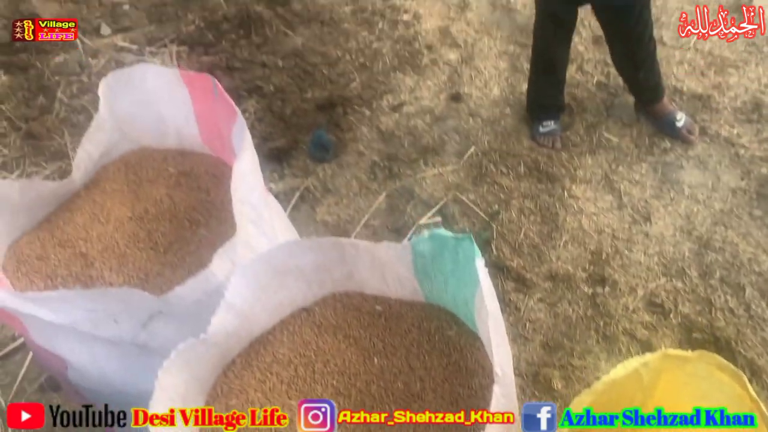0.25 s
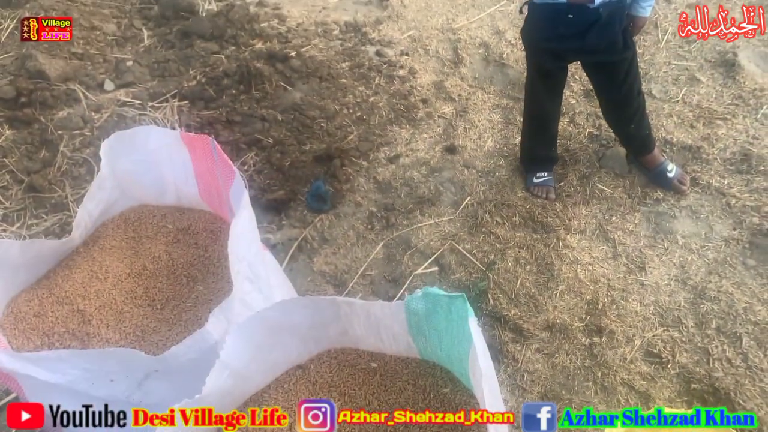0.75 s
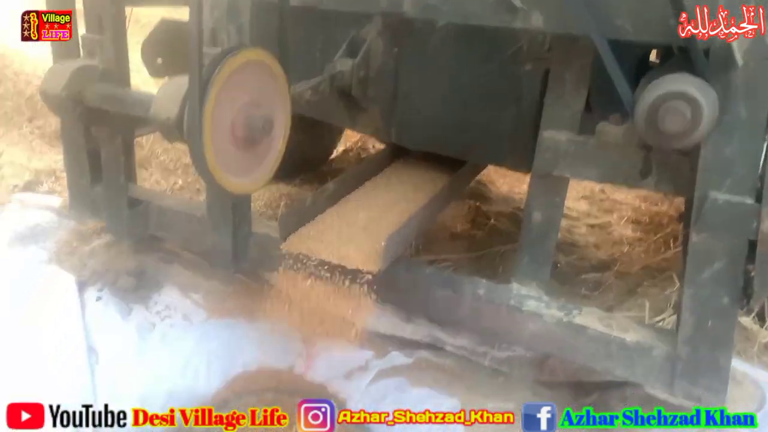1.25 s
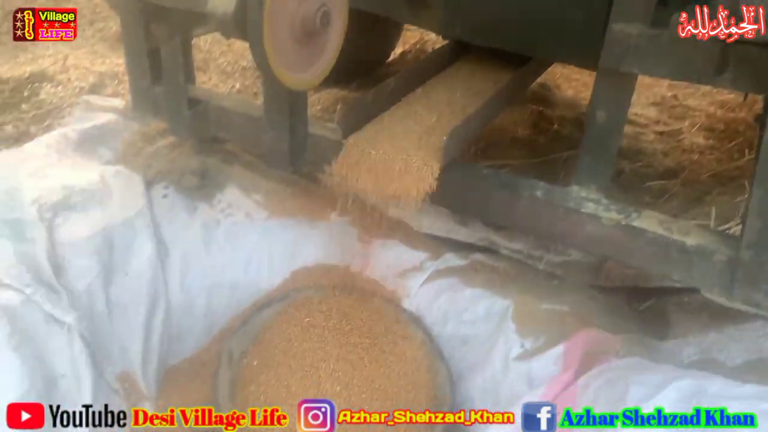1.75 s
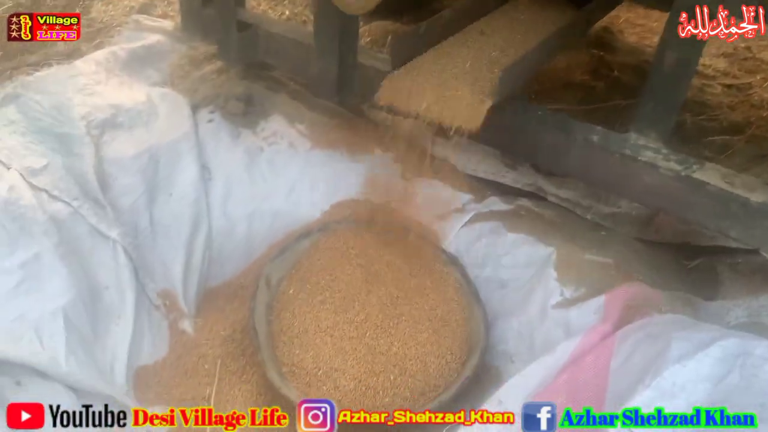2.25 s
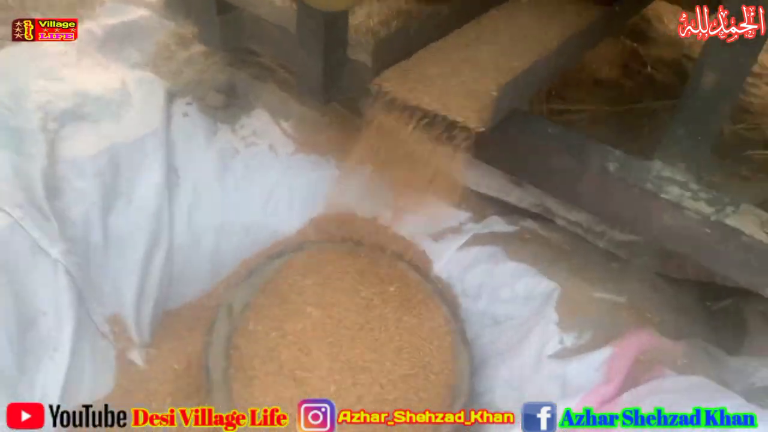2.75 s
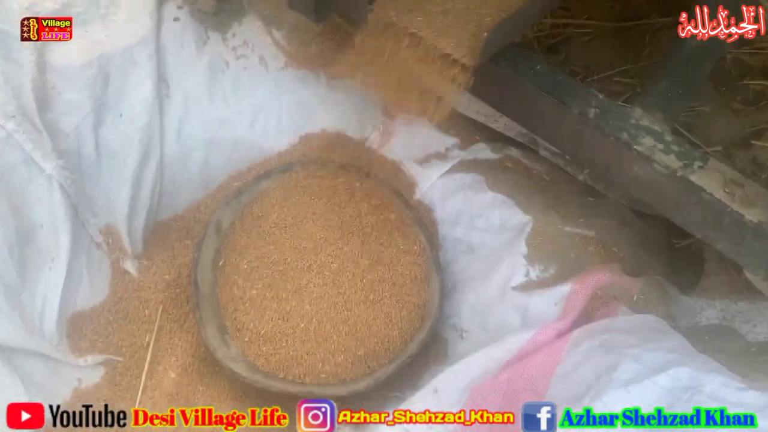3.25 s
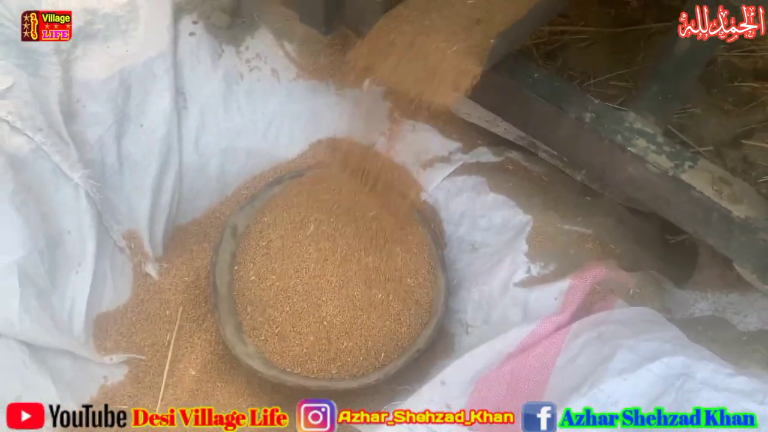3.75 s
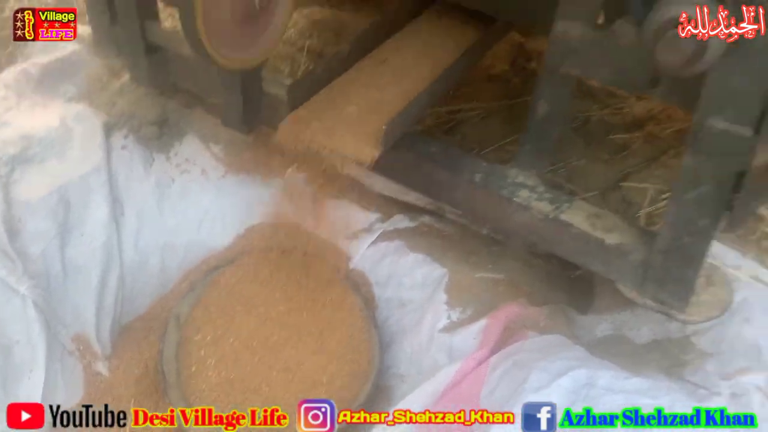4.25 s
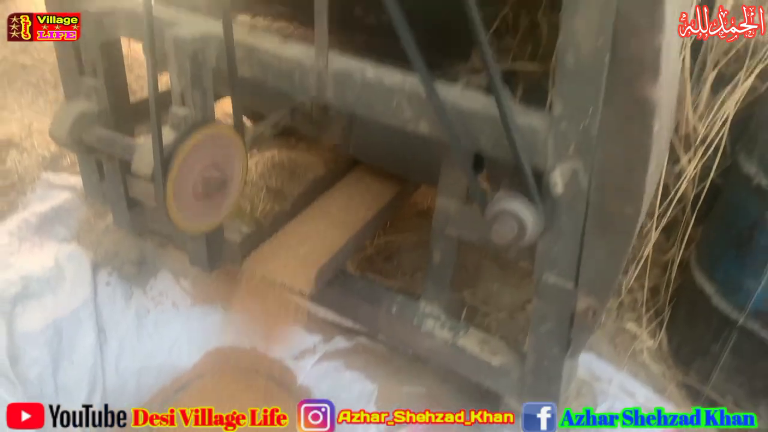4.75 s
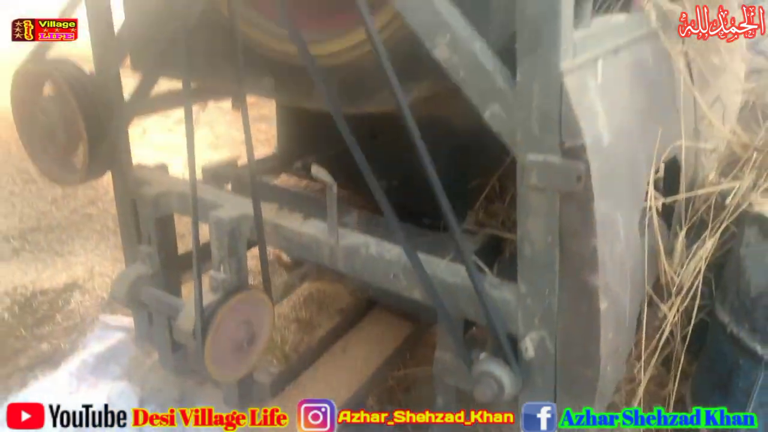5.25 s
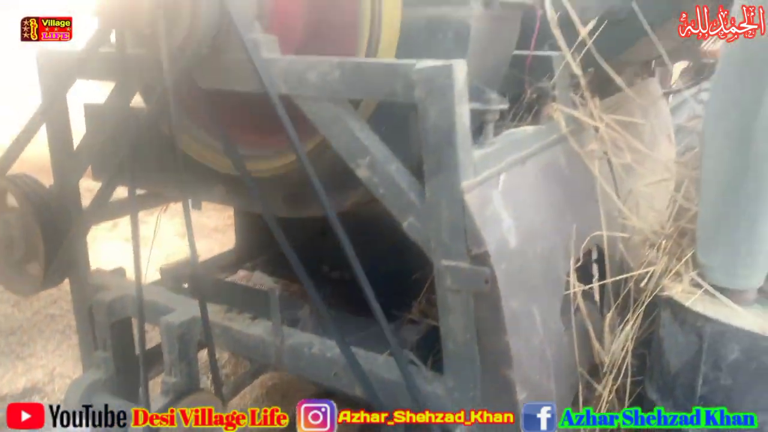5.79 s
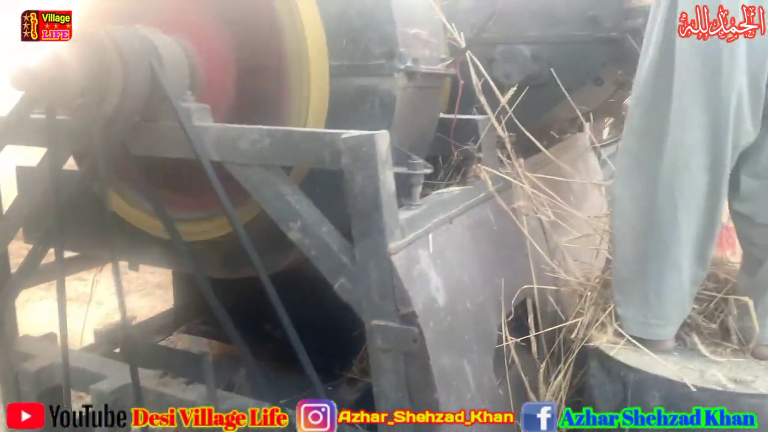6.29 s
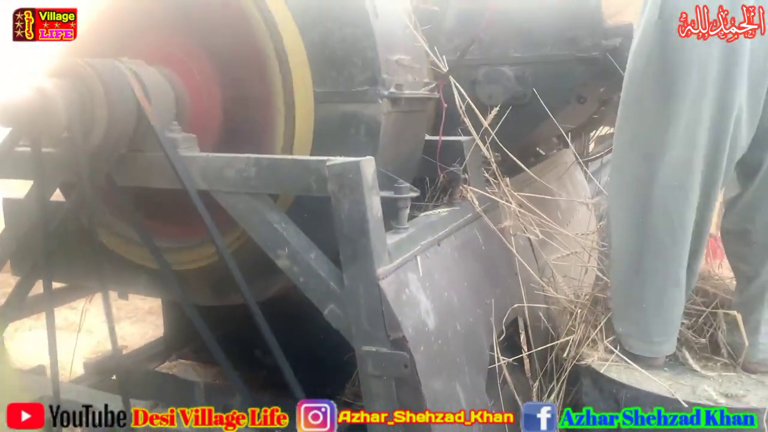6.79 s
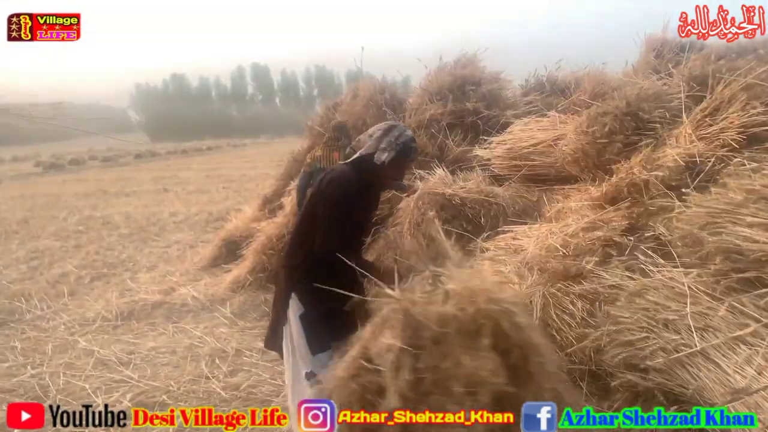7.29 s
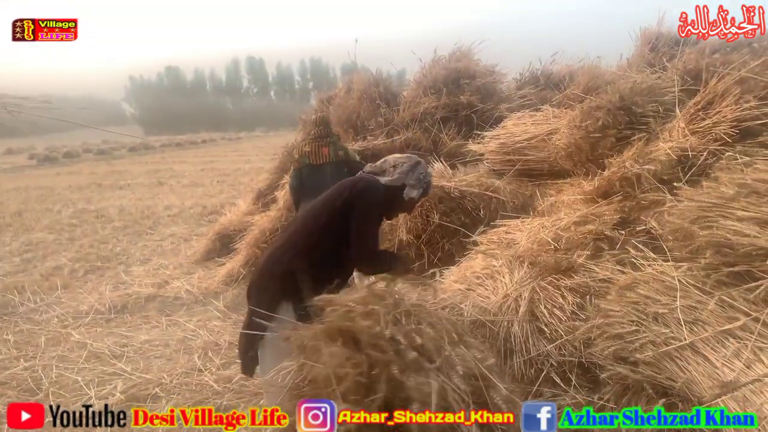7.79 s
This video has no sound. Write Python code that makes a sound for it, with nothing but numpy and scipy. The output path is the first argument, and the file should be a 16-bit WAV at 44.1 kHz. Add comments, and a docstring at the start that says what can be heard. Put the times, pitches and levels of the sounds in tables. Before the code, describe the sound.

From 0 to 1 second, near the grain sacks, a tractor engine drones low and steady under a thick midrange threshing roar, with soft grain hiss and a few faint metallic slaps. At about 1.04 a hard cut with a tiny dip jumps to the chute: the engine is slightly higher, the hiss brighter and closer, and sheet metal chatters. Clear tinny slaps run from 1.6 to 2.4, then around 2.9 to 4.0. The stereo handheld microphone turns past the belts near 4.8, with hard slaps until 5.5, reaching the drum, whose casing rings hollowly and waveringly around 800 hertz as the engine sags slightly. More slaps come from 6.3 to 6.9. At 7.1 another cut moves to the straw stack: duller continuous roar, reduced hiss, faint rattles, continuing to the end at 8.

```python
"""A tractor engine drones under the dull roar of a wheat thresher, heard close by from behind the grain sacks.
The engine is a stack of tones tied to its firing; roar and hiss are shaped noise, the hiss from grain strikes.
The drum casing rings in wavering bands of noise, and a sheet-metal sieve chatters and slaps in runs.
The sound cuts to the grain chute, turns past the belts to the drum, then cuts to the straw stack."""
import sys
import numpy as np
from scipy import signal
from scipy.fft import rfft, irfft, next_fast_len
from scipy.io import wavfile

SR = 44100
rng = np.random.default_rng(int(sys.argv[2]) if len(sys.argv) > 2 else 0)


def waveform_to_disk(signal):
    """Save audio, clipped to [-1, 1], as 16-bit WAV at the path in sys.argv[1]."""
    frames = np.transpose(np.atleast_2d(signal))
    scaled = np.clip(frames, -1, 1) * 32767
    samples = np.round(scaled).astype(np.int16)
    wavfile.write(sys.argv[1], SR, samples)


N = 354123

# moments when the listening place jumps and the sound briefly almost drops out: cut_s
CUTS_S = [1.043, 7.104]
FADE_OUT_S, FADE_IN_S = .004, .016
# the slow turn leaves the chute, passes the belts, reaches the drum: time_s
TURN_S = [3.3, 4.79, 5.53]
# how the two ears differ at the sacks, chute, belts, drum and stack:
# left_lag_ms, left_lag_rad, channels_alike_up_to_hz, likeness_above_0_to_1
STANDPOINTS = [(0.337, 0.45, 1450, 0.4), (0.209, 0.016, 650, 0.2), (0.138, .02, 600, 0.22),
               (0.015, .02, 900, .15), (-0.485, 0.041, 2200, 0.5)]
# overall levels at the sacks, chute, belts, drum and stack: roar_db, grain_hiss_db
LEVELS = [(-15, -30), (-14.5, -23), (-17, -24.5), (-15, -25), (-15.5, -27.5)]

# engine speed, one list a shot: time_s, firings_per_s
SPEED = [
    [(0, 43.7), (1.04, 43.2)],
    [(1.05, 45.7), (2.2, 46.3), (3.8, 46.7), (5.0, 45.1), (6.0, 43.6), (7.1, 43.3)],
    [(7.11, 43.2), (8.03, 43.7)],
]
# engine tones at each standpoint: order_per_cycle (three firings a cycle), level_db (before chance)
ORDERS_SACKS = [(3, -18), (4, -22), (5, -20.5), (6, -13.5), (7, -30), (9, -24), (12, -35), (15, -43),
                (18, -25), (21, -30), (24, -27), (27, -26.5)]
ORDERS_CHUTE = [(3, -15), (4, -31), (5, -27), (6, -13.5), (7, -33), (9, -22), (12, -25), (15, -29),
                (18, -40), (21, -30), (24, -27.5), (27, -27)]
ORDERS_BELTS = [(3, -17), (4, -31), (5, -22), (6, -15.5), (7, -33), (9, -22), (12, -36), (15, -22),
                (18, -23.5), (21, -21), (24, -31), (27, -27.5)]
ORDERS_DRUM = [(3, -21.5), (4, -28), (5, -31), (6, -17.5), (7, -37), (9, -24.5), (12, -44), (15, -24),
               (18, -19), (21, -26.5), (24, -33.5), (27, -32)]
ORDERS_STACK = [(3, -23), (4, -27), (5, -39), (6, -21), (7, -28), (9, -26), (12, -36), (15, -44), (18, -25),
                (21, -50), (24, -33), (27, -39)]

# tone colour of drum, fan and exhaust roar at each standpoint: pitch_hz, relative_level_db
ROAR_SACKS = [(36, -22), (60, -18), (75, -19), (110, -10), (160, 3), (200, -6.5), (290, 0), (400, -0.5),
              (520, -3), (650, -2), (850, 0), (1050, -10.5), (1400, -14), (2000, -58)]
ROAR_CHUTE = [(36, -22), (60, 4.5), (75, -2), (110, -1.5), (160, -3), (200, -5.5), (270, -7), (330, -5.5),
              (400, -5.5), (520, -7), (650, -8), (850, -10.5), (1050, -13), (1400, -16), (2000, -26.5)]
ROAR_BELTS = [(36, -15), (60, -8), (75, 2), (110, -10.5), (160, -8), (200, -8.5), (290, -6), (400, -10.5),
              (520, -9.5), (650, -16), (850, -13.5), (1050, -17), (1400, -23.5), (2000, -44)]
ROAR_DRUM = [(36, -28), (60, 3), (75, -3), (110, -3), (160, -3), (200, -6.5), (290, -3.5), (400, -11),
             (520, -12), (650, -9), (850, -10.5), (1050, -17), (1400, -22.5), (2000, -32)]
ROAR_STACK = [(36, -19), (60, -15), (75, 3), (110, -8), (160, -2), (200, -0.5), (290, 1.5), (400, 1),
              (520, -1), (650, -6), (850, -1.5), (1050, -5.5), (1400, -17), (2000, -34)]

# tone colour of grain and chaff hiss at each standpoint: pitch_hz, relative_level_db
GRAIN_SACKS = [(1100, -8), (1600, -4), (2200, -6), (3000, -9), (4000, -11), (5200, -12), (6500, -14),
               (7800, -16), (8100, -15), (8800, -19), (10500, -21), (13000, -23), (14300, -26),
               (14900, -36)]
GRAIN_CHUTE = [(1100, -4), (1600, -3), (2200, -6), (3000, -10.5), (4000, -12), (5200, -15.5), (6500, -14),
               (7800, -15), (8150, -8.5), (8700, -13), (10500, -16), (13000, -19), (14300, -22),
               (14900, -32)]
GRAIN_BELTS = [(1100, -4), (1600, -3), (2200, -6), (3000, -9.5), (4000, -10), (5200, -14.5), (6500, -13),
               (7800, -14), (8150, -8.5), (8700, -13), (10500, -15), (13000, -18.5), (14300, -21.5),
               (14900, -32)]
GRAIN_DRUM = [(1100, -4), (1600, -2), (2200, -5), (3000, -7), (4000, -7), (5200, -11), (6500, -12),
              (7800, -12), (8150, -8.5), (8700, -11), (10500, -13.5), (13000, -16), (14300, -19),
              (14900, -29)]
GRAIN_STACK = [(1100, -6), (1600, -6), (2200, -5), (2900, -6), (3300, -12), (5200, -17), (6500, -18),
               (7800, -19), (8100, -16), (8800, -18), (10500, -19), (13000, -22), (14300, -24),
               (14900, -34)]

# two casing rings and a broad swell in the roar, one list a shot:
# time_s, upper_ring_hz, upper_level_db, lower_ring_hz, lower_level_db, swell_hz, swell_level_db
RINGS = [
    [(0, 850, -31, 620, -27.5, 995, -50), (1.04, 855, -29.5, 620, -26, 996, -48)],
    [(1.05, 830, -32, 640, -26, 1130, -30), (1.6, 802, -44, 660, -33, 1200, -34),
     (2.0, 797, -26.5, 660, -27, 1270, -28), (2.3, 812, -41, 620, -41, 1289, -31.5),
     (2.6, 818, -26, 580, -31, 1330, -29.5), (3.1, 815, -28, 580, -29, 1481, -27.5),
     (3.7, 810, -37, 590, -37, 1397, -36), (4.0, 815, -30, 600, -44, 1356, -35),
     (4.6, 822, -26, 620, -33, 1030, -30), (5.0, 800, -41, 620, -25.5, 995, -35),
     (5.5, 798, -27, 630, -26, 926, -40), (6.0, 799.6, -27, 660, -30, 926, -31),
     (6.5, 807, -23.5, 660, -45, 932, -30), (7.1, 815, -24.5, 660, -38, 930, -35)],
    [(7.11, 998, -40, 870, -38, 996, -48), (8.03, 988, -41, 870, -38, 1000, -50)],
]
CASING_WIDTH_HZ, SWELL_WIDTH_HZ = 36, 130

# natural rings of the sieve's sheet metal: ring_hz, width_hz, relative_level_db
SIEVE = [(1040, 60, 0), (1280, 70, 1), (1500, 70, 0), (1720, 80, -1), (2370, 70, -1), (2650, 80, -3),
         (2900, 90, -1), (3150, 80, -1), (3380, 80, 0), (3680, 70, 1), (4150, 100, -3), (4700, 140, -7),
         (5150, 120, -6), (5650, 130, -8)]
# clear slaps at the ends of sieve strokes, in runs:
# start_s, strength_db, strongest_ring_hz, lower_ring_hz, lower_boost_db, treble_relative_to_slap_db
SLAPS = [(0.129, -24, 2700, 2370, 0, -12), (0.319, -24, 2450, 2370, 0, -13),
         (0.771, -27, 2660, 2370, 0, -11), (0.899, -27, 2780, 2370, 0, -13), (1.289, -27, 4600, 2370, 0, 3),
         (1.629, -17.5, 3686, 2370, 7, -6), (1.814, -18, 3670, 2370, 4, -4),
         (1.992, -19.5, 3220, 2370, 3, 1), (2.174, -16.5, 3397, 1720, 12, -1.5),
         (2.362, -21.5, 3700, 2370, 12, -1), (2.598, -25, 2900, 1720, 2, -2),
         (2.928, -24, 3540, 2370, 0, -2), (3.098, -22, 2930, 2370, 2, -4), (3.280, -17.5, 3450, 2340, 3, 0),
         (3.378, -30, 2890, 1720, 3, -6), (3.462, -17, 3190, 2370, 6, -2), (3.634, -20, 4150, 2400, 5, -1),
         (3.823, -19.5, 2920, 2370, 6, -4), (4.006, -19, 4120, 1720, 5, -3),
         (4.747, -19, 3000, 2370, 3, -4), (4.934, -16, 3660, 2640, 7, -1), (5.118, -17, 3670, 2354, 7, -6),
         (5.307, -15, 3670, 3150, 4, -5.5), (5.508, -23, 2896, 2364, 3, -10),
         (6.279, -21, 3147, 2370, 4, -13), (6.472, -17.5, 3150, 2650, 6, -9),
         (6.663, -20, 2900, 2370, 3, -7), (6.756, -25, 2910, 1717, 3, -14), (6.859, -15, 3160, 2370, 4, -6),
         (7.196, -24, 4150, 2370, 5, -10), (7.396, -25, 2630, 1720, 3, -9), (7.49, -28, 2630, 2374, 0, -10),
         (7.747, -30, 2650, 1730, 3, -14)]
# a slap is a quick run of touches: delay_s, relative_level_db
TOUCHES = [(0, -3), (.0045, 0), (.008, 0), (.013, -3)]
# T60 is the time to die away by 60 dB; the tail's level is relative to the slap
SLAP_RISE_S, SLAP_TOUCH_T60_S, SLAP_T60_S, SLAP_TAIL_DB = .002, .035, .09, -4
KNOCK_DB, SLAP_RATTLE_DB, BROAD_DB = 21, -2, -8   # one click, ringing rattle, broad rattle
TICKS_PER_S, TICK_DB = 67, 6.5   # loose straw and stones tick each ring; least tick above the flow

# left-right balance of the two microphone ports: pitch_hz, left_minus_right_db
PORTS = [(40, -2.5), (200, -3.5), (500, -1), (1000, 1.3), (2200, 1), (4500, -1), (7700, -2), (8200, -7.5),
         (8900, -2.5), (10000, -.5), (14000, -.3)]
# treble that both ports share, late on the left: from_hz, full_hz, likeness_0_to_1, lag_ms, lead_rad
SHARED_TREBLE = (7000, 10000, .75, .305, .6)
CUTOFF_HZ = 14900


def from_db(db):
    """Turn a level in dB into a plain multiplier."""
    return np.exp(np.asarray(db) * (np.log(10) / 20))


def rms_one(x):
    """Scale a sound to an average strength (rms) of 1."""
    return x / np.sqrt(np.mean(x ** 2) + 1e-20)


def in_time(tables):
    """Join the shots' rows by straight lines and give each column as a curve over time."""
    s, *columns = np.transpose(np.concatenate(tables))
    t = np.arange(N) / SR
    return [np.interp(t, s, column) for column in columns]


def at_hz(points, hz):
    """Read a tone colour in dB between its points, with pitch spaced by ratio."""
    point_hz, point_db = np.array(points).T
    return np.interp(np.log(hz + 1), np.log(point_hz), point_db)


def drift(rate):
    """Wander slowly by chance with rms 1; a higher rate in Hz wanders faster."""
    step = 40   # samples between slow points
    r = np.exp(-2 * np.pi * rate * step / SR)
    chance = rng.standard_normal(N // step + 2002)
    slow = signal.lfilter([1], [1, -2 * r, r * r], chance)[2000:]
    return np.interp(np.arange(N) / step, np.arange(len(slow)), rms_one(slow))


def resonance(x, hz, width_hz):
    """Ring at one pitch like a struck sheet, with gain 1 at the peak; narrower rings last longer."""
    r = np.exp(-np.pi * width_hz / SR)
    feed = np.array([1, 0, -1]) * (1 - r * r) / 2
    return signal.lfilter(feed, [1, -2 * r * np.cos(2 * np.pi * hz / SR), r * r], x)


def standing():
    """Share of each standpoint over time: two hard cuts and one slow turn between them."""
    t = np.arange(N) / SR
    close = (t >= CUTS_S[0]) & (t < CUTS_S[1])
    turn = [close * np.interp(t, TURN_S, facing) for facing in np.eye(3)]
    return np.array([t < CUTS_S[0], *turn, t >= CUTS_S[1]])


def heard(pair, spectra, shares):
    """Colour two unrelated noises for each place, alike in the bass and with the left shifted in time."""
    size = next_fast_len(N)
    hz = np.fft.rfftfreq(size, 1 / SR)
    mid, side = rfft(pair, size)
    out = 0
    for spectrum, share, standpoint in zip(spectra, shares, STANDPOINTS):
        lag_ms, lag_rad, alike_hz, rest = standpoint
        alike = np.clip(rest + (1 - rest) / (1 + (hz / alike_hz) ** 2), 0, 1)
        colour = from_db(at_hz(spectrum, hz)) * (hz > 30)
        common = np.sqrt(1 + alike) * mid
        different = np.sqrt(1 - alike) * side
        delay = np.exp(-1j * (2 * np.pi * hz * lag_ms / 1000 + lag_rad))
        channels = np.array([(common + different) * delay, common - different])
        out = out + share * rms_one(irfft(colour * channels, size)[:, :N])
    # keep the strength steady while two places blend
    return out / np.sqrt(np.sum(shares ** 2, axis=0))


def engine(shares):
    """Even firing makes clean tones at every third order; uneven cylinders fill in unsteady ones between."""
    firings, = in_time(SPEED)
    cycle = 2 * np.pi * np.cumsum(firings) / SR / 3   # three firings make one cycle
    lag_ms, lag_rad = np.transpose(STANDPOINTS)[:2] @ shares
    out = np.zeros((2, N))
    for rows in zip(ORDERS_SACKS, ORDERS_CHUTE, ORDERS_BELTS, ORDERS_DRUM, ORDERS_STACK):
        order = round(rows[0][0])
        level_db = np.transpose(rows)[1] @ shares
        late = 2 * np.pi * order * firings / 3 * lag_ms / 1000 + lag_rad
        if order % 3:
            chance = .5 + .6 * (drift(3) + 1j * drift(3))
            size, turn = np.abs(chance), np.angle(chance)
        else:
            size = from_db((.3 + .012 * order) * drift(4))
            turn = rng.uniform(0, 2 * np.pi) + .003 * order * drift(3)
        phase = order * cycle + turn
        out += np.sqrt(2) * from_db(level_db) * size * np.cos([phase - late, phase])
    return out


def roar(level_db, shares):
    """Beaters tearing straw, fan and exhaust turbulence make dull noise that swells a little."""
    white = rng.standard_normal((2, N)) * from_db(0.37 * drift(4.4))
    dull = signal.sosfilt(signal.butter(4, 2200, fs=SR, output="sos"), white)
    spectra = [ROAR_SACKS, ROAR_CHUTE, ROAR_BELTS, ROAR_DRUM, ROAR_STACK]
    return from_db(level_db) * heard(dull, spectra, shares)


def grain(level_db, shares):
    """Thousands of kernels strike sheet metal and the heap; the flow comes in clumps."""
    strength = from_db(1.9 * np.minimum(rng.exponential(1, (2, N)), 5))
    sizes = strength * rng.choice([-1, 1], (2, N))
    hits = rng.random((2, N)) < 14000 / SR   # about 14000 strikes per second in each channel
    clumps = from_db(.5 * drift(3) + .5 * drift(12) + .3 * drift(40))
    strikes = sizes * hits * clumps
    thin = signal.sosfilt(signal.butter(4, 1000, "high", fs=SR, output="sos"), strikes)
    spectra = [GRAIN_SACKS, GRAIN_CHUTE, GRAIN_BELTS, GRAIN_DRUM, GRAIN_STACK]
    return from_db(level_db) * heard(thin, spectra, shares)


def casing():
    """The drum casing rings in two unsteady bands under the beaters, with a broader drifting swell."""
    out, columns = 0, in_time(RINGS)
    widths = [CASING_WIDTH_HZ, CASING_WIDTH_HZ, SWELL_WIDTH_HZ]
    for hz, level_db, width_hz in zip(columns[::2], columns[1::2], widths):
        shared = drift(width_hz / 2) + 1j * drift(width_hz / 2)
        own = drift(width_hz / 2) + 1j * drift(width_hz / 2)
        carrier = np.exp(2j * np.pi * np.cumsum(hz) / SR)
        channels = np.array([shared, shared + 0.56 * own]) * carrier
        out = out + from_db(level_db) * rms_one(channels.real)
    return out


def sieve_chatter(flow_db):
    """Grain flow shakes each ring of the sheet, the low ones most; loose straw and stones add ticks."""
    flares = np.array([from_db(flow_db + 5 + 4.5 * drift(11)) / (1 + (hz / 1900) ** 2.2)
                       for hz, _, _ in SIEVE])
    hits = rng.random(flares.shape) < TICKS_PER_S / SR
    ticks = hits * from_db(4.4 * np.minimum(rng.exponential(1, N), 3))
    return flares + ticks * from_db(flow_db + TICK_DB)


def sieve(flow_db):
    """The sheet chatters with the flow; the load slaps it in a few touches and the rattle dies away."""
    modes = sieve_chatter(flow_db)
    knocks = np.zeros(modes.shape)
    rattle, treble = np.zeros(N), np.zeros(N)
    mode_hz = np.array(SIEVE)[:, 0]
    t = np.arange(-.03 * SR, .15 * SR) / SR   # time around one slap
    tail = (t > 0) * from_db(SLAP_TAIL_DB - 60 * np.maximum(t, 0) / SLAP_T60_S)
    touch_s, touch_db = np.transpose(TOUCHES)[:, :, None]
    touches = rng.normal(0, 1, (len(SLAPS), 2, len(TOUCHES), 1))
    chance_db = rng.normal(0, 1.5, (len(SLAPS), len(SIEVE)))
    for slap, own_db, (late, hard) in zip(SLAPS, chance_db, touches):
        s, strength_db, ring_hz, lower_hz, lower_db, treble_db = slap
        since = t - touch_s - .001 * late   # each touch comes about 1 ms early or late
        rise = np.exp(np.minimum(since, 0) / SLAP_RISE_S)
        decay_db = -60 * np.maximum(since, 0) / SLAP_TOUCH_T60_S
        blow = rise * from_db(touch_db + 1.5 * hard + decay_db)
        shape = np.maximum(blow.max(axis=0), tail) * from_db(strength_db)
        at = round(s * SR) + np.arange(len(t)) - round(.03 * SR)
        # rings near the strongest pitch take most of a hard blow
        near_db = (4 + (strength_db + 24)) * np.exp(-(np.log(mode_hz / ring_hz) / .055) ** 2)
        near_db = near_db + lower_db * np.exp(-(np.log(mode_hz / lower_hz) / .07) ** 2)
        # one click goes in at the second touch's listed time
        knock_at = round((s + touch_s[1, 0]) * SR)
        knocks[:, knock_at] = from_db(own_db + near_db + strength_db + KNOCK_DB)
        modes[:, at] += from_db(own_db + near_db + SLAP_RATTLE_DB)[:, None] * shape
        rattle[at] += shape
        treble[at] += from_db(treble_db) * shape
    white = rng.standard_normal((3, 2, N))
    shaking = 0.72 * white[0] + 0.33 * white[0, 0]   # partly shared by both channels
    rings = 0
    for k, (hz, width_hz, db) in enumerate(SIEVE):
        push = shaking * modes[k] + (-1) ** k * knocks[k]
        rings = rings + from_db(db) * resonance(push, hz, width_hz) * np.sqrt(SR / width_hz)
    broad = signal.sosfilt(signal.butter(2, [1400, 4800], "band", fs=SR, output="sos"), white[1])
    bright = signal.sosfilt(signal.butter(2, [5500, 13000], "band", fs=SR, output="sos"), white[2])
    broad_rattle = from_db(BROAD_DB) * rattle * rms_one(broad)
    return from_db(-21.5) * rings + broad_rattle + treble * rms_one(bright)


def scene():
    """Add all sources as heard from the changing standpoint."""
    shares = standing()
    roar_db, grain_db = np.transpose(LEVELS) @ shares
    # the chatter is faint away from the machine, at the sacks and the stack
    chatter_db = grain_db - 10 * (shares[0] + shares[-1])
    machine = engine(shares) + roar(roar_db, shares)
    return machine + grain(grain_db, shares) + casing() + sieve(chatter_db)


def record(dry):
    """Two ports colour the channels, cuts dip and fade back, peaks are rounded and the top is cut."""
    size = next_fast_len(N)
    hz = np.fft.rfftfreq(size, 1 / SR)
    tilt_db = at_hz(PORTS, hz) / 2
    left, right = rfft(dry, size)
    from_hz, full_hz, likeness, lag_ms, lead_rad = SHARED_TREBLE
    alike = np.interp(hz, [from_hz, full_hz], [0, likeness])
    delay = np.exp(1j * (lead_rad - 2 * np.pi * hz * lag_ms / 1000))
    left = np.sqrt(1 - alike ** 2) * left + alike * right * delay
    ports = irfft(np.array([left, right]) * from_db([tilt_db, -tilt_db]), size)[:, :N]
    t = np.arange(N) / SR
    for s in CUTS_S:
        fade = np.where(t < s, (s - t) / FADE_OUT_S, (t - s) / FADE_IN_S)
        ports = ports * np.clip(fade, .05, 1)
    rounded = .95 * np.tanh(ports / .95)
    return signal.sosfilt(signal.ellip(12, .5, 80, CUTOFF_HZ, fs=SR, output="sos"), rounded)


dry = scene()
out = record(dry)
waveform_to_disk(out)
```